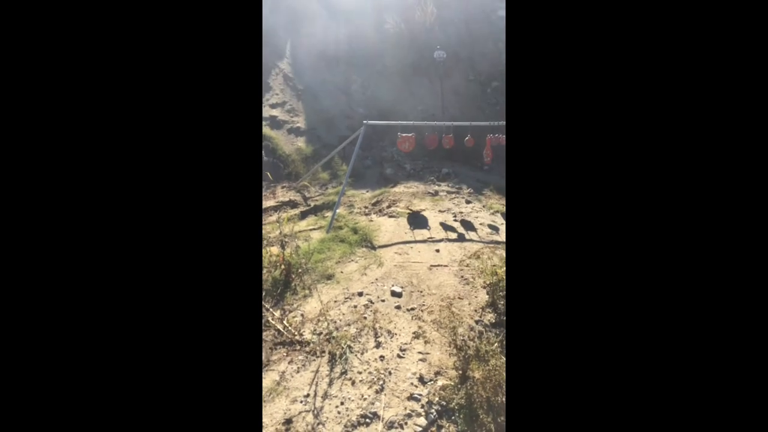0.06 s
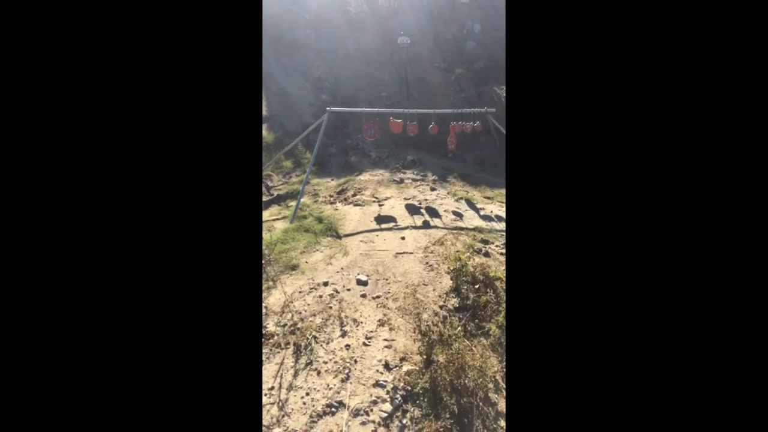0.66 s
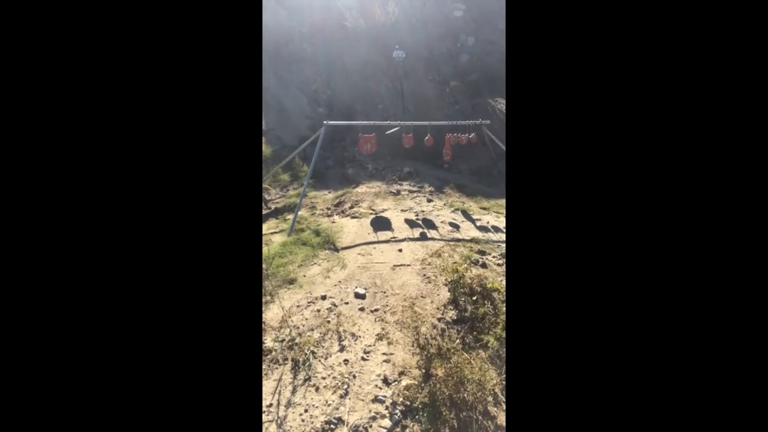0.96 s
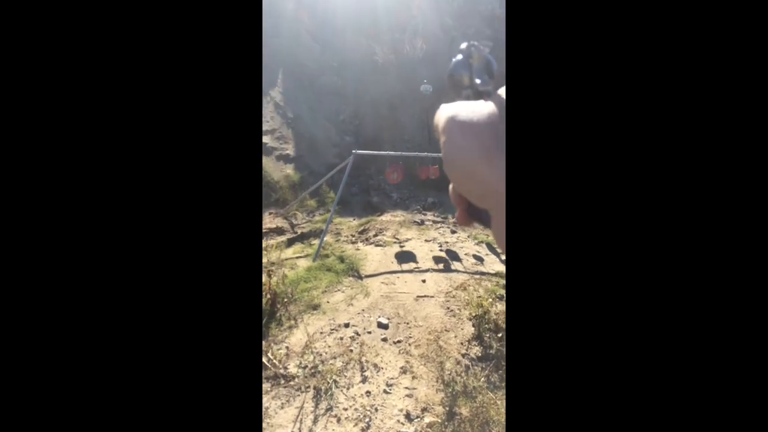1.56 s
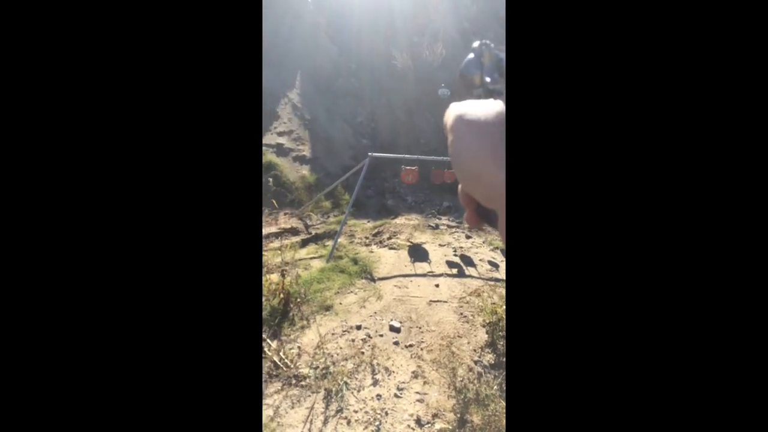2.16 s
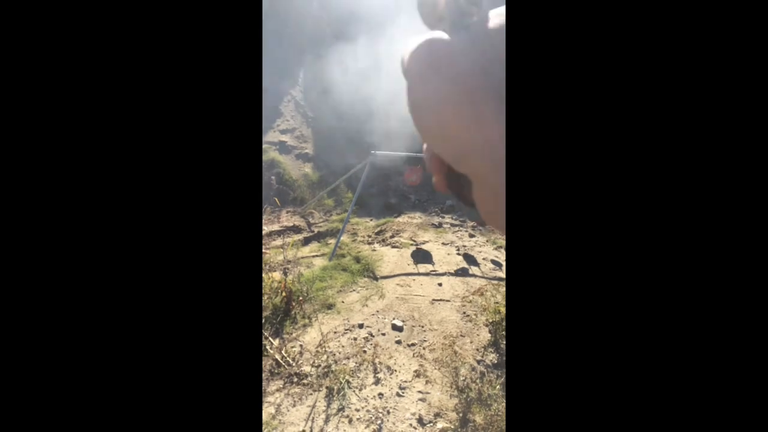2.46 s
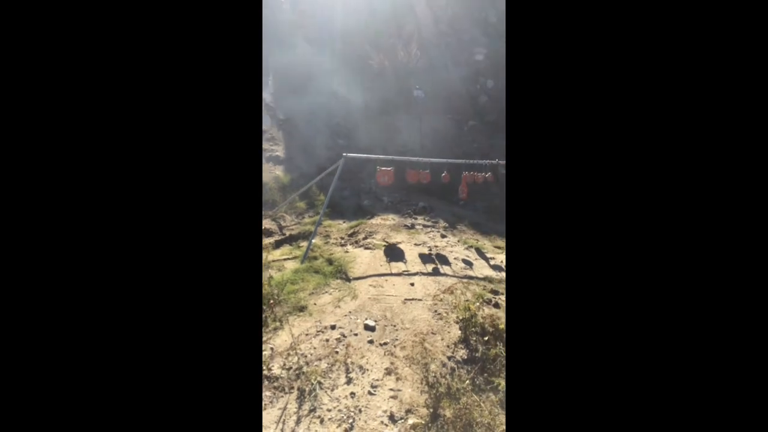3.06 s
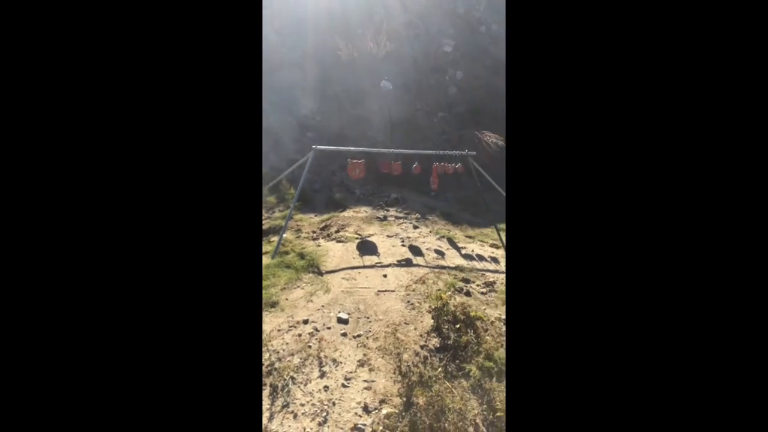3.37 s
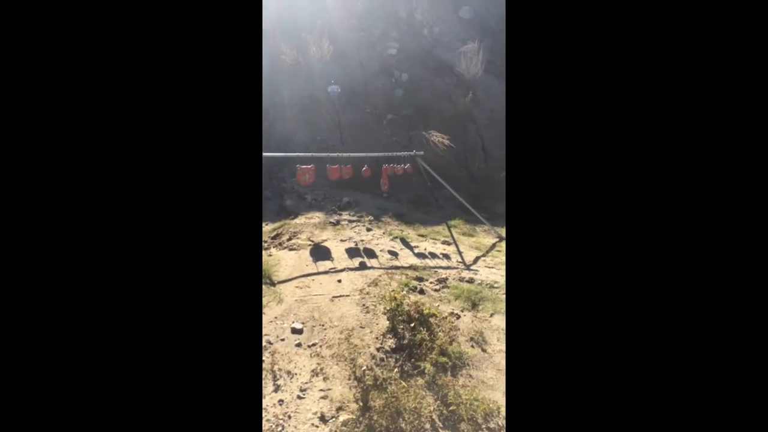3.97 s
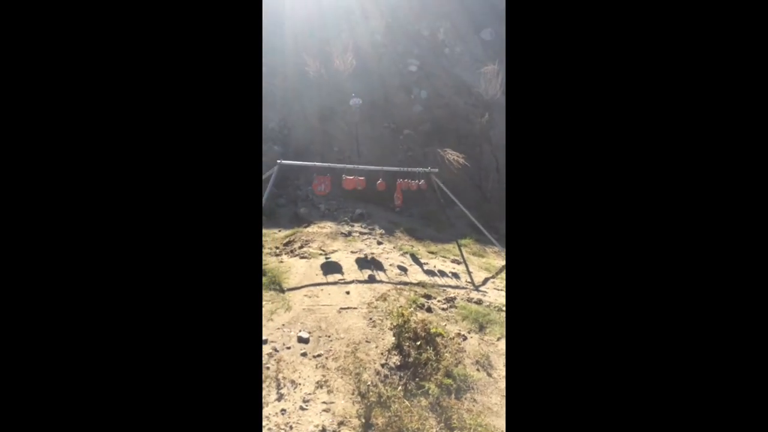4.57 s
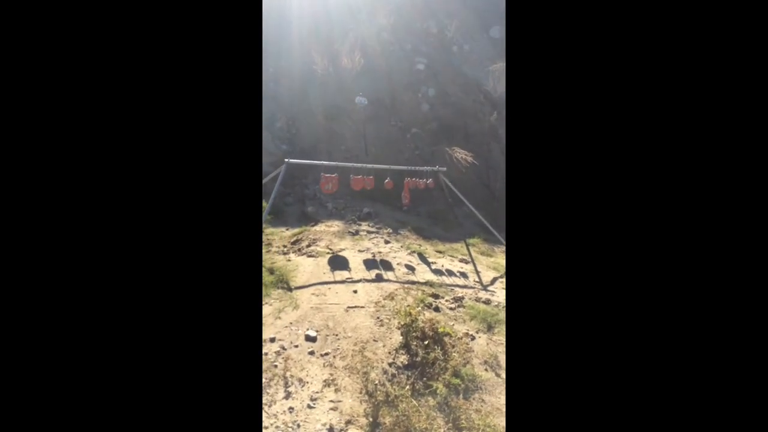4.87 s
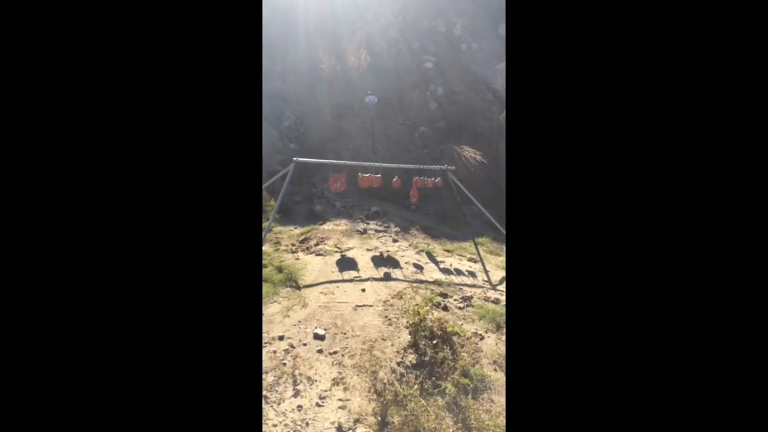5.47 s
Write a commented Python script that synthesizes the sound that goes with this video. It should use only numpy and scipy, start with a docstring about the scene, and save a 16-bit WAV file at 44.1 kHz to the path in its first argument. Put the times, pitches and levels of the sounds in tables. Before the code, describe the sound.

A revolver clicks and cocks up close, then fires one shot that clangs a steel plate, ringing and echoing off a hillside.

```python
"""Revolver shot at a steel plate

A revolver is handled and cocked up close, its steel parts sliding, catching and ringing, then fired once
outdoors. The bullet clangs a hanging plate that rings and sways, a hillside throws the sound back, and
a limiter ducks and recovers. The action clicks again; a low hum, like a far idling engine, lies under."""
import sys
import numpy as np
from scipy import signal
from scipy.fft import rfft, irfft, next_fast_len
from scipy.io import wavfile
from scipy.ndimage import uniform_filter1d

SR = 44100
rng = np.random.default_rng(int(sys.argv[2]) if len(sys.argv) > 2 else 0)


def transcribe(signal):
    """Save signal, clipped to [-1, 1], as a 16-bit WAV file at the path in sys.argv[1]."""
    frames = np.atleast_2d(signal).T
    limited = np.clip(frames, -1, 1)
    pcm = np.round(limited * 32767).astype(np.int16)
    wavfile.write(sys.argv[1], SR, pcm)


N = 247842
T = np.arange(N) / SR

# faint outdoor air (frequency [Hz], level [dB])
AIR_COLOUR = [(35, -26.5), (60, -1.5), (222, -21.5), (323, -22.5), (593, -28.5), (842, -29.5), (3940, -44),
              (4860, -46), (5860, -45.5), (13300, -49), (16000, -60)]
# the blast as the hillside returns it (frequency [Hz], level [dB])
HILL_COLOUR = [(100, -28.5), (350, -8.5), (900, -7), (1400, 1.5), (1850, 8.5), (2500, 0), (3000, -3.5),
               (6000, -5.5), (8000, -20), (13000, -22.5), (16000, -27.5)]
# echoes off the slopes (peak time [s], spread [s], blast level [dB], clang level [dB])
SLOPE_ECHOES = [(2.89, 0.11, -25.5, -27), (3.148, 0.083, -33.5, -30.5), (3.44, 0.077, -54.5, -50)]
# dry snaps right at the microphone (time [s], level [dB], t60 [s])
SNAPS = [(0.6415, -16.5, 0.039), (0.661, -7.5, 0.007), (0.668, -21.5, 0.057), (1.447, -47, 0.0072),
         (3.4942, -14, 0.024), (3.5158, -11, 0.0061), (3.524, -12, 0.0099)]
# tone colour of a snap (frequency [Hz], level [dB])
SNAP_COLOUR = [(120, -24), (200, -11.5), (1180, -12), (1530, 6), (1680, -19), (2560, 7), (3830, -2),
               (4520, 0), (16000, 1.5)]
# short dull thumps, including the hammer's knock just before the shot (time [s], level [dB], pitch [Hz])
THUMPS = [(0.661, -20, 560), (0.665, -25, 99.8), (2.401, -15, 526), (3.319, -34.5, 91), (4.584, -35, 74),
          (4.722, -34, 154), (5.086, -37, 80.5), (5.312, -37, 118.7)]
# hammer, pawl and cylinder slide and catch (time [s], level [dB], sliding time [s])
CATCHES = [(0.000, -26.5, .0054), (0.027, -34, 0.032), (0.072, -34.5, .016), (0.148, -36.5, .0024),
           (0.195, -47.5, 0.022), (0.23, -38, .0028), (0.436, -42, 0.0076), (0.514, -27, .0048),
           (0.606, -24.5, .034), (0.689, -33.5, .025), (0.724, -32.5, .0057), (0.806, -30.5, .024),
           (1.112, -30.5, .006), (1.127, -32, .014), (1.237, -43, 0.0087), (1.305, -49.5, .012),
           (1.602, -35.5, .0086), (1.678, -50, 0.029), (1.845, -46.5, .003), (1.912, -60, 0.02),
           (2.102, -42, .014), (2.294, -57.5, 0.0088), (2.386, -38.5, 0.022), (3.585, -31.5, .005),
           (3.630, -27, .006), (3.812, -49.5, 0.0052), (4.014, -43, .003), (4.099, -40, .014),
           (4.545, -35.5, .0068), (4.566, -29, .0061), (4.656, -42, .0031), (5.002, -25, .0033),
           (5.128, -38.5, .0025), (5.454, -61.5, 0.0028)]
# steel sliding on steel (frequency [Hz], level [dB])
SCRAPE_COLOUR = [(150, -30), (350, -23), (600, -13), (1100, -13), (1600, -5.5), (2100, 2), (3500, -1.5),
                 (5000, 3.5), (6200, -5), (9000, -5.5), (14000, -9.5), (16000, -12)]
# modes of the revolver's steel (frequency [Hz], level [dB], t60 [s])
GUN_MODES = [(2031, -14.5, 0.1), (2679, -3.5, 0.11), (3490, 0, 0.092), (4800, -13, 0.23), (4864, -4, .13),
             (5100, -8.5, 0.093), (5520, -11.5, 0.27), (6200, -24, 0.14), (6870, -4, 0.11),
             (7340, -9, 0.12), (8080, -11, 0.16), (8660, -8, 0.079), (10000, -17.5, 0.051),
             (11400, -15, .12), (13200, -13.5, 0.2), (13400, -29.5, 0.16)]
# modes of the plate (frequency [Hz], clang level [dB], ring level [dB], ring t60 [s])
PLATE_MODES = [(662, -19, -30, 1.7), (1529, -24, 1, 1.8), (1803, -9, -26, 1.6), (2115, -11, -20, 1.9),
               (2440, -20, -26, 1.2), (2649, -18, -27, 1.5), (3300, -25, -24, 2), (3682, -3, -6, 1.6),
               (4151, -17, -23, 2.5), (4231, -18, -26, 1.6), (4729, -2, -28, 1.1), (5922, -13, -29, 1.5),
               (6377, -7, -14, 1.4), (7773, -1, -5, .8), (8005, -15, -25, 1.2), (8662, -14, -21, .8),
               (9383, -20, -24, 1.2), (9620, -9, -13, .9), (10659, -10, -26, .7), (11688, -7, -22, .7),
               (12020, -21, -33, 1.1), (12740, -18, -36, .7), (14300, -22, -30, .9), (15400, -24, -38, .9)]
# the muzzle blast's roar (frequency [Hz], level [dB])
BLAST_COLOUR = [(18, -44), (30, -14.5), (93, -4.5), (345, -12.5), (404, -8), (526, -3), (760, -4.5),
                (1040, -4), (2010, -8.5), (2350, -8), (3400, -11.5), (11400, -16.5), (16000, -25.5)]

SHOT_S, IMPACT_S = 2.4075, 2.452


def from_db(db):
    """Decibels to gain."""
    return 10 ** (np.asarray(db) / 20)


def rms_one(x):
    """Scale to unit power."""
    return x / np.sqrt(np.mean(x ** 2) + 1e-20)


def add(out, s, sound):
    """Mix a sound in, starting at time s."""
    at = int(np.clip(round(s * SR), 0, N - 1))
    out[at:at + len(sound)] += sound[:N - at]


def decay(t, t60):
    """Full level until t = 0, then a fall of 60 dB every t60 seconds."""
    return np.exp(-np.log(1000) * np.maximum(t, 0) / t60)


def noise(colour, size, tilt_db=0, ripple_db=0, ripple_hz=100):
    """Coloured noise at unit power, tilted in dB per octave above 1 kHz, rippled by close resonances."""
    length = next_fast_len(size)
    hz = np.maximum(np.fft.rfftfreq(length, 1 / SR), 1)
    colour_hz, colour_db = np.transpose(colour)
    eq_db = np.interp(np.log(hz), np.log(colour_hz), colour_db)
    ripple = np.interp(hz / ripple_hz, np.arange(1024), rng.standard_normal(1024))
    gain = from_db(eq_db + tilt_db * np.log2(np.maximum(hz, 1000)) + ripple_db * np.minimum(ripple, 1.5))
    return rms_one(irfft(rfft(rng.standard_normal(length)) * gain, length)[:size])


def drift(rate_hz, size):
    """Smooth random modulation of unit spread, rolling off above rate_hz."""
    control_rate = 200
    hz = np.fft.rfftfreq(2048, 1 / control_rate)
    slow = rms_one(irfft(rfft(rng.standard_normal(2048)) / (1 + (hz / rate_hz) ** 4)))
    return np.interp(T[:size] * control_rate, np.arange(len(slow)), slow)


def background(hum_hz=49.7, sag_hz_per_s=0.98, hum_db=-48, fade_db_per_s=1.97, air_db=-59):
    """The bed: a low hum slowly sinks and fades in faint outdoor air."""
    phase = 2 * np.pi * np.cumsum(hum_hz - sag_hz_per_s * T) / SR
    hum = rms_one(np.sin(phase) + from_db(-19) * np.sin(2 * phase))
    return hum * from_db(hum_db - fade_db_per_s * T) + from_db(air_db) * noise(AIR_COLOUR, N)


def flutter(hz, rate_hz):
    """A tone that arrives by many paths, so its level and phase wander."""
    phase = 2 * np.pi * hz * T
    return (drift(rate_hz, N) * np.cos(phase) + drift(rate_hz, N) * np.sin(phase)) / 2


def hillside(dull_hz=6500, shimmer_db=-11, shimmer_db_per_octave=-7):
    """Rocks and trees scatter the blast back as a wash, the clang as fluttering tones dulled by air."""
    scatter = from_db(-24) * decay(T - SHOT_S, t60=1.5)   # diffuse tail between the echoes
    blast_echo = clang_echo = 0
    for s, spread_s, blast_db, clang_db in SLOPE_ECHOES:
        swell = np.exp(-((T - s) / spread_s) ** 2)
        blast_echo += from_db(blast_db) * swell
        clang_echo += from_db(clang_db) * swell
    wash = (scatter + blast_echo) * noise(HILL_COLOUR, N, tilt_db=0.5, ripple_db=2.5, ripple_hz=70)
    tones = sum(from_db(5.5 + .25 * mode_db) * flutter(hz, rate_hz=16) / (1 + (hz / dull_hz) ** 3)
                for hz, mode_db, *_ in PLATE_MODES)
    # the plate's many weak high modes merge into a shimmer
    weak_hz = np.geomspace(4900, 14500, 18) * rng.normal(1, .015, 18)
    weak_gains = from_db(shimmer_db_per_octave * np.log2(weak_hz / weak_hz[0]))
    shimmer = rms_one(sum(gain * flutter(hz, rate_hz=22) for hz, gain in zip(weak_hz, weak_gains)))
    return (wash + (scatter + clang_echo) * tones + clang_echo * from_db(shimmer_db) * shimmer) * (T > SHOT_S)


def slapback(arrival_s=2.613, level_db=-8, hz=1030):
    """The bank behind the plate returns the blast's midrange as one hard, hollow echo."""
    mids = noise([(hz / 4, -30), (hz, 0), (hz * 2, -16), (hz * 8, -50)], N)
    return from_db(level_db) * mids * decay(T - arrival_s, t60=0.083) * (T >= arrival_s)


def handling(tail_db=-27, thump_cycles=0.39):
    """Dry snaps with a faint tail, and short dull thumps, including the hammer's knock before the shot."""
    out, t = np.zeros(N), T[:SR // 8]
    for s, db, t60 in SNAPS:
        envelope = decay(t, t60) + from_db(tail_db) * decay(t, t60=0.11)
        add(out, s, from_db(db) * noise(SNAP_COLOUR, len(t)) * envelope)
    for s, db, hz in THUMPS:
        envelope = np.exp(-np.abs(T - s) * hz / thump_cycles)
        out += from_db(db) * envelope * np.cos(2 * np.pi * hz * (T - s))
    return out


def rattle(gap_s=.04, settle_db=-14.5, loss_db=5, lead_s=.018, lead_db=-16.5, rub_s=.012):
    """Loose parts settle after each catch in three ever lighter touches; a rub leads into slower ones."""
    out, t = np.zeros(N), T[:SR // 10]
    envelope = np.minimum(t / rub_s, 1) * decay(t - rub_s, t60=0.02)
    for s, db, slide_s in CATCHES:
        delays = gap_s * np.cumsum(rng.uniform(.5, 1.5, 3))
        touches = [(s + delay, db + settle_db - loss_db * k) for k, delay in enumerate(delays, 1)]
        if slide_s > .005:   # the quickest catches snap in without warning
            touches.append((s - lead_s, db + lead_db))
        for at, touch_db in touches:
            rub = noise(SCRAPE_COLOUR, len(t), tilt_db=-4, ripple_db=6, ripple_hz=170)
            add(out, at, from_db(touch_db) * envelope * rub)
    return out


def catch(db, slide_s, free_hz, firm_db=-24, grit_db=3.5, tail_db=-24):
    """Steel parts slide and catch: a gritty burst that sets the frame and cylinder ringing."""
    t = T[:SR // 3]
    ring_db = 2 + 0.6 * (db - firm_db) - 278.5 * slide_s   # light or slow catches mostly scrape
    tilt_db = 2.93 + 0.4 * (db - firm_db)   # firmer catches are brighter
    grain = rms_one(uniform_filter1d(rng.standard_normal(len(t)), size=50))
    grit = rms_one(from_db(grit_db * grain))
    scrape = noise(SCRAPE_COLOUR, len(t), tilt_db, ripple_db=4, ripple_hz=170) * grit
    small_modes = from_db(tail_db) * noise(SCRAPE_COLOUR, len(t), tilt_db, ripple_db=9, ripple_hz=45)
    click = scrape * decay(t - slide_s, t60=0.076) + small_modes * decay(t - slide_s, t60=.26)
    click *= np.minimum(t / (.35 * slide_s), 1)
    for hz, mode_db, t60 in GUN_MODES:
        if abs(hz / free_hz - 1) < .02:   # modes the grip leaves free ring louder and longer
            mode_db, t60 = mode_db + 1.5, t60 * 1.33
        # every catch shifts and favours the modes differently
        hz, mode_db = hz * rng.normal(1, .006), mode_db + rng.normal(0, 3)
        gain = from_db(mode_db + ring_db + tilt_db * np.log2(hz / 5000))
        envelope = np.minimum(t / slide_s, 1) * decay(t - slide_s, t60)   # builds while the parts slide
        click += gain * envelope * np.sin(2 * np.pi * (hz * t + rng.random()))
    return from_db(db) * click


def action(free_before_hz=4790, free_after_hz=2676):
    """The revolver is worked, catch by catch; after the shot the grip leaves a lower mode free."""
    out = np.zeros(N)
    for s, db, slide_s in CATCHES:
        add(out, s, catch(db, slide_s, free_before_hz if s < SHOT_S else free_after_hz))
    return out


def plate(attack_s=0.016, clang_s=0.16, sway_s=0.61, facing_s=3.126, sway_db=5, waver_db=4, beat_hz=7.3):
    """The bullet's blow: a hard clang fades as the plate swings away, a purer ring lingers and sways."""
    out, t = np.zeros(N), T[:3 * SR]
    # swaying on its chains, the plate's upper ring is loudest when it faces the shooter
    facing = np.cos(2 * np.pi * (IMPACT_S + t - facing_s) / sway_s)
    wobble = decay(t, t60=5)   # the first wild wobble gives way to a steady sway
    attack = np.minimum(t / attack_s, 1)
    for hz, clang_db, ring_db, t60 in PLATE_MODES:
        upper = hz > 3000
        clang = from_db(clang_db - 1) * np.exp(-(t / clang_s) ** 2)
        ring = from_db(ring_db - 1.5 + sway_db * upper * facing * (1 - wobble)) * decay(t, t60)
        # high modes radiate in narrow beams, so they waver most
        waver = from_db(waver_db * wobble * drift(28, len(t)) * min(hz / 6000, 1))
        tone = np.sin(2 * np.pi * (hz * t + rng.random()))
        # upper modes come in close pairs that beat
        twin = 0.19 * wobble * upper * np.sin(2 * np.pi * ((hz + beat_hz) * t + rng.random()))
        add(out, IMPACT_S, (clang + ring) * waver * attack * (tone + twin))
    return out


def boom(level_db=-2, hz=500, hold_s=.075):
    """The low body of the blast, swelling along the ground and outlasting the crack."""
    body = noise([(hz / 16, -18), (hz / 7, -5), (hz / 3, -5), (hz, 0), (hz * 2, -10), (hz * 8, -50)], N)
    t = T - SHOT_S
    swell = np.clip(2 * t / hold_s, 0, 1)
    return from_db(level_db) * body * swell * decay(t - hold_s, t60=.2)


def blast(crack_db=13.5, hold_s=0.068, roll_db=-6, lump_db=2.5, crossover_hz=1500):
    """The muzzle's roar holds, lumpy with ground reflections, then loses treble as it rolls away."""
    t = T - SHOT_S
    tilt_db = np.interp(t, [.06, .15], [0, -9])   # per octave band
    highs, roar = noise(BLAST_COLOUR, N), np.zeros(N)
    for octave in range(4):   # peel off bands from the bottom up
        lowpass = signal.butter(4, crossover_hz * 2 ** octave, fs=SR, output="sos")
        band = signal.sosfiltfilt(lowpass, highs)
        roar += band * from_db(tilt_db * octave)
        highs = highs - band
    roar += highs * from_db(tilt_db * 4)   # the top band dies first
    crack = from_db(crack_db) * decay(t - hold_s, t60=0.12)
    roll = from_db(roll_db) * decay(t - hold_s, t60=.6)
    return roar * (crack + roll) * from_db(lump_db * drift(60, N)) * (T >= SHOT_S)


def scene():
    """Gun, plate, echoes and bed, mixed in mono."""
    gun = action() + rattle() + handling() + blast() + boom()
    return (gun + slapback() + plate() + hillside() + background())[None]


def record(dry, threshold_db=-15, max_hold_db=20, release_db_per_s=22, low_cut_hz=38, high_cut_hz=16000):
    """A fast limiter ducks the shot and creeps back; peaks are rounded, rumble and top are cut."""
    power = uniform_filter1d(dry[0] ** 2, size=300)
    over_db = np.maximum(10 * np.log10(np.maximum(power, 1e-12)) - threshold_db, 0)
    release_db = release_db_per_s * T
    held_db = np.maximum.accumulate(np.minimum(over_db, max_hold_db) + release_db) - release_db
    ducked = dry * from_db(-np.maximum(over_db, held_db))
    low_cut = signal.butter(4, low_cut_hz, "high", fs=SR, output="sos")
    high_cut = signal.ellip(10, .2, 80, high_cut_hz, fs=SR, output="sos")
    rounded = np.tanh(signal.sosfilt(low_cut, ducked))
    return signal.sosfilt(high_cut, rounded)


dry = scene()
out = record(dry)
transcribe(out)
```